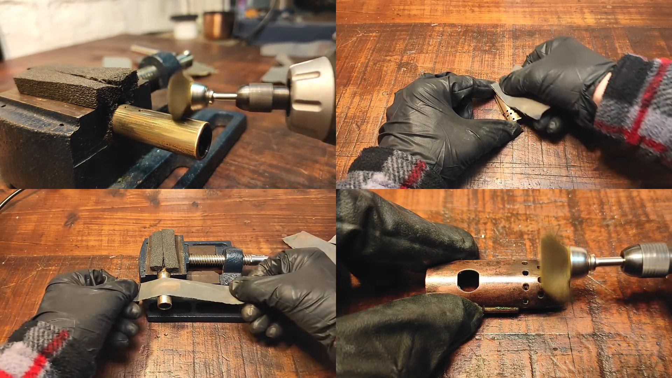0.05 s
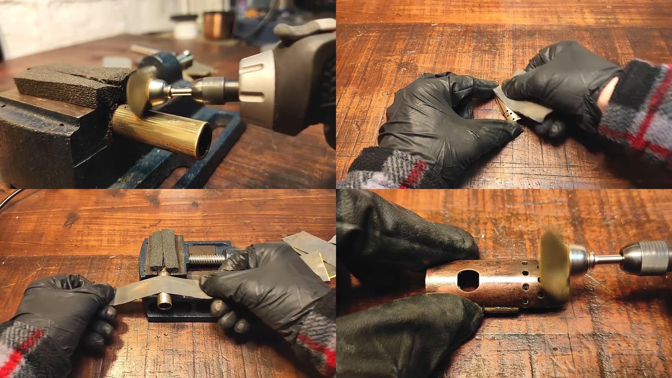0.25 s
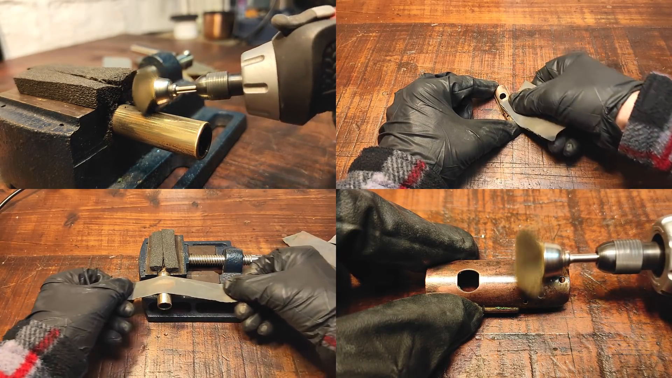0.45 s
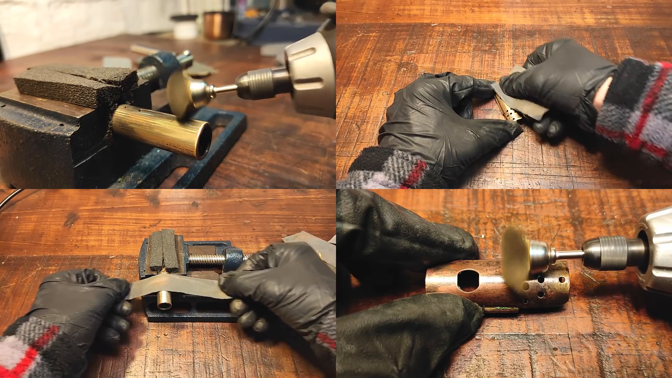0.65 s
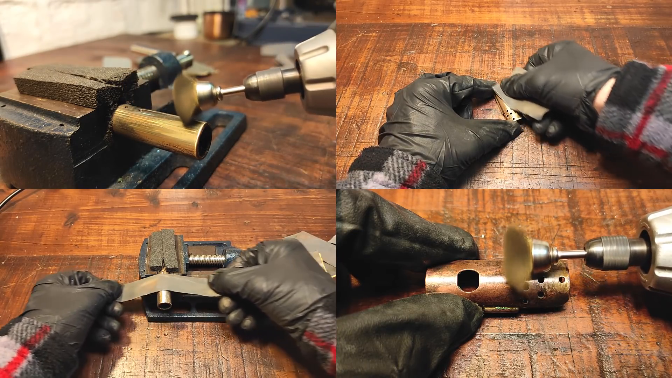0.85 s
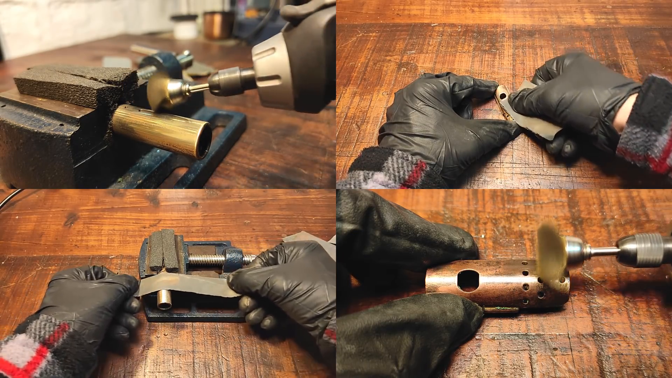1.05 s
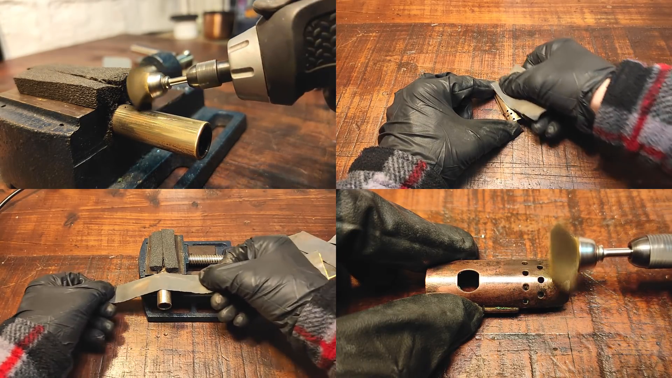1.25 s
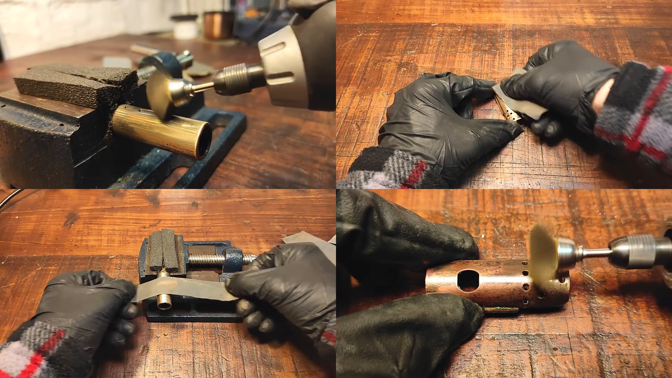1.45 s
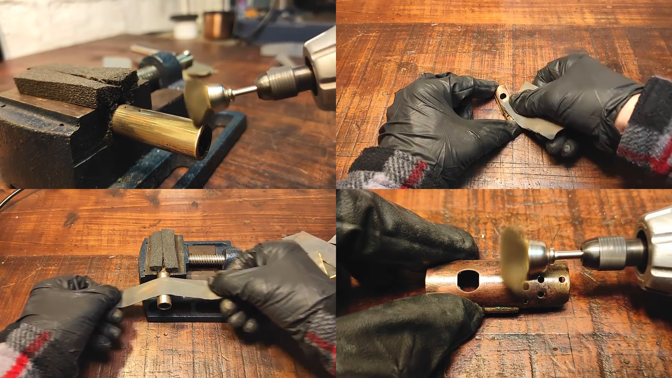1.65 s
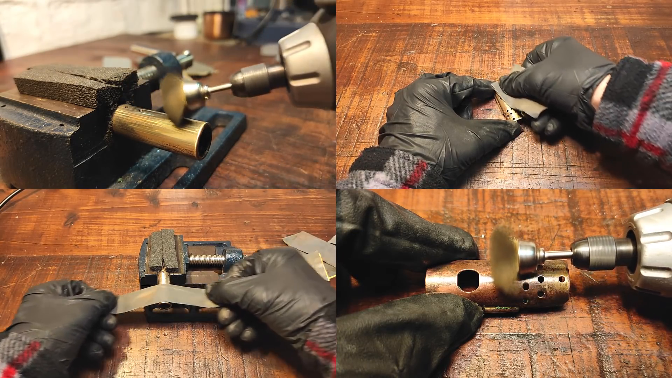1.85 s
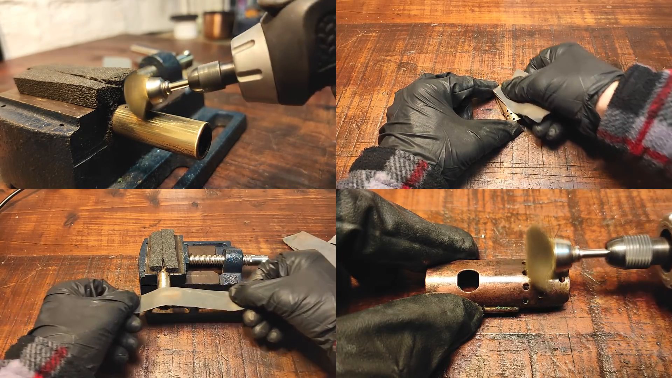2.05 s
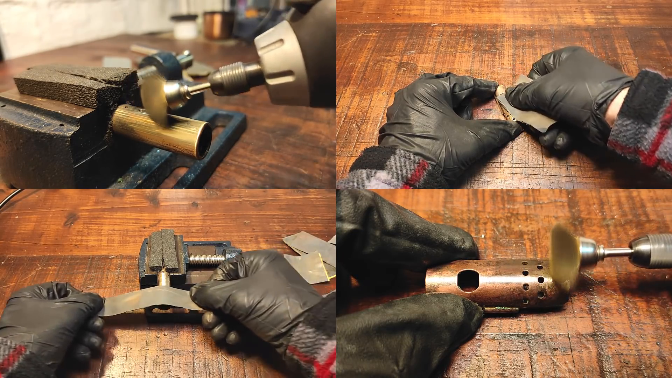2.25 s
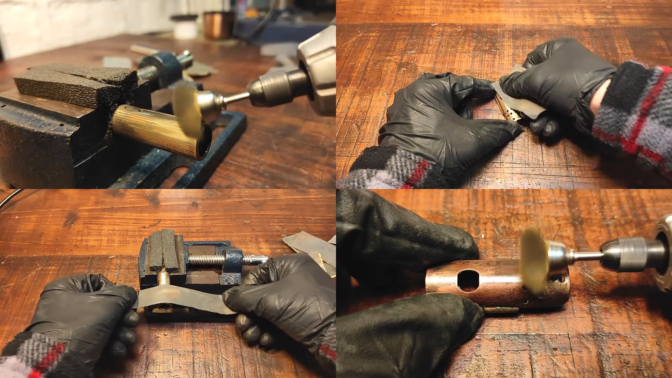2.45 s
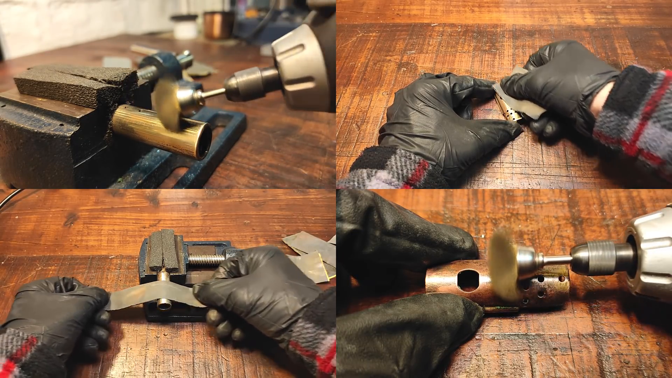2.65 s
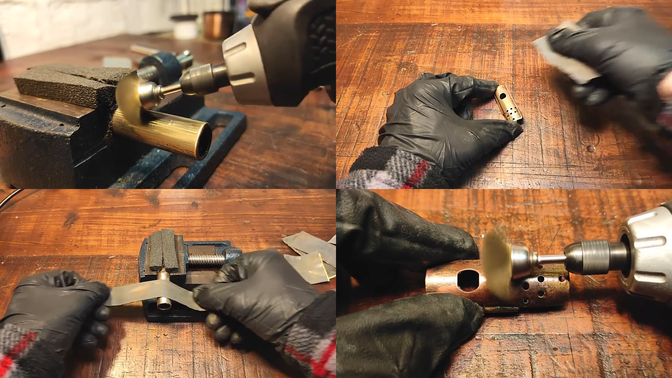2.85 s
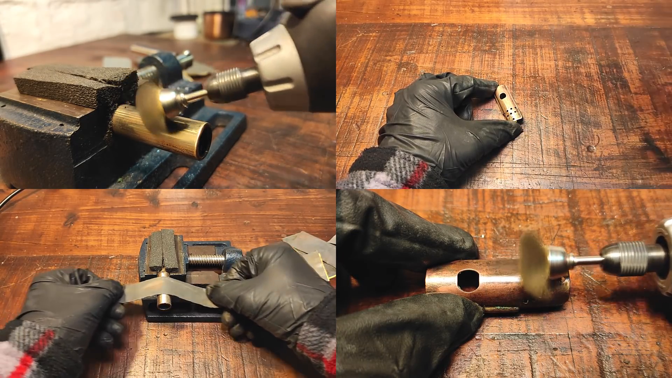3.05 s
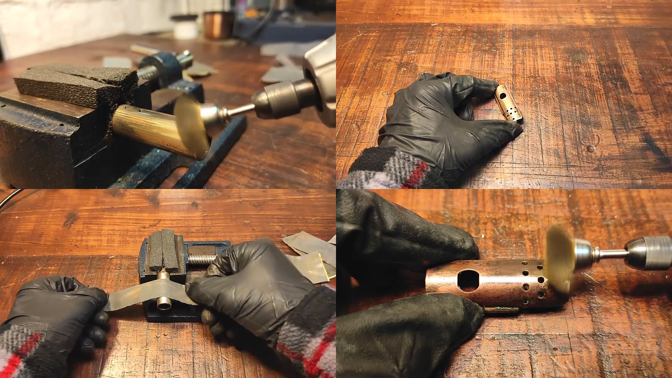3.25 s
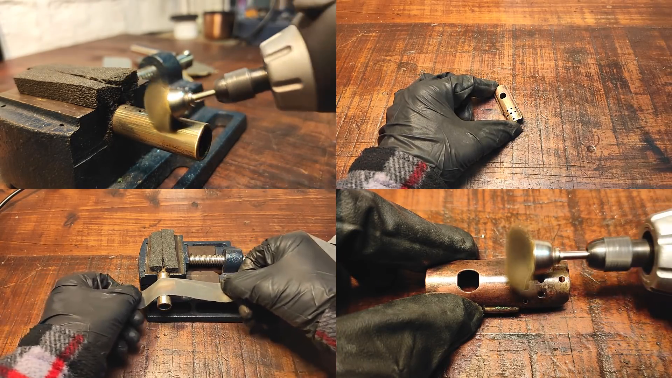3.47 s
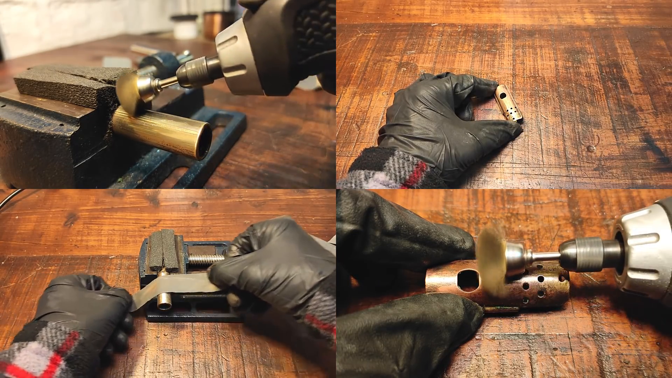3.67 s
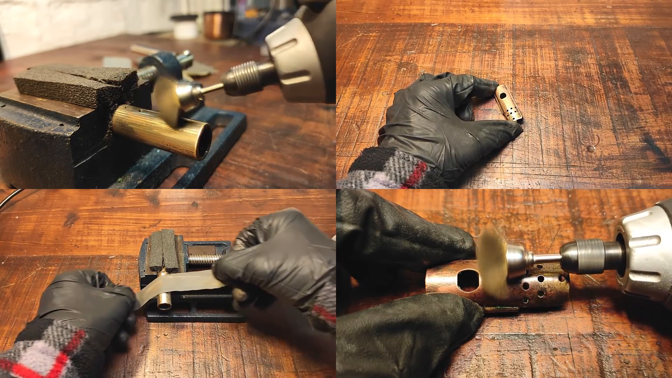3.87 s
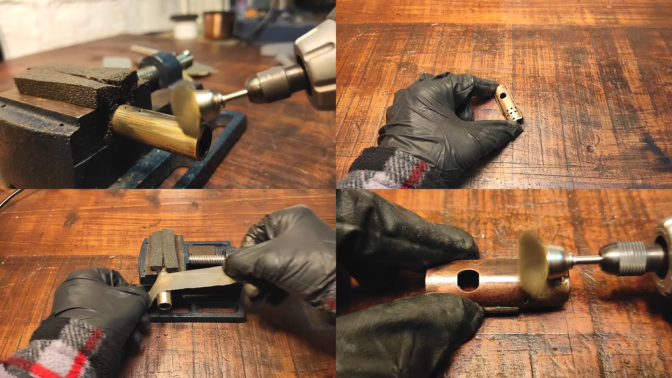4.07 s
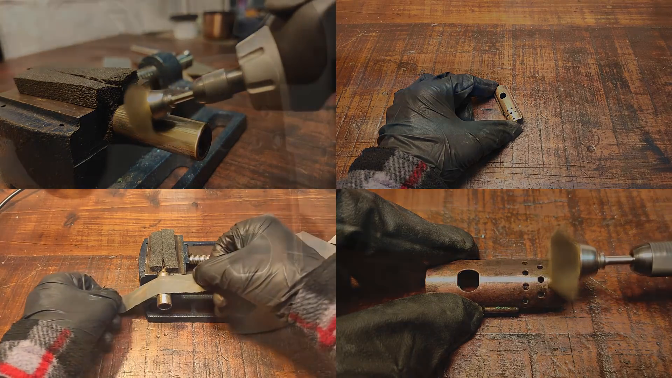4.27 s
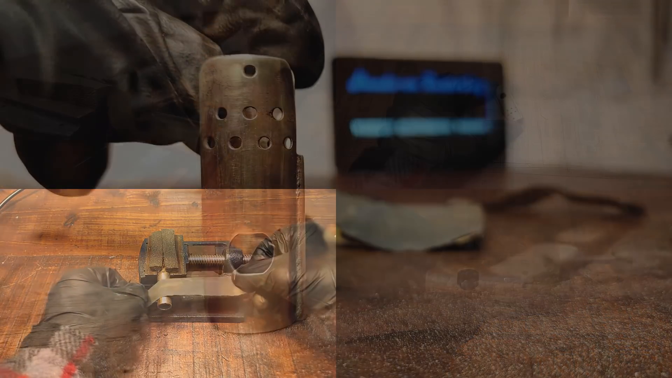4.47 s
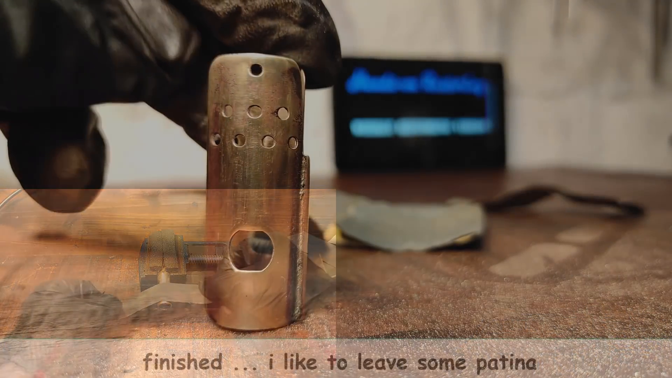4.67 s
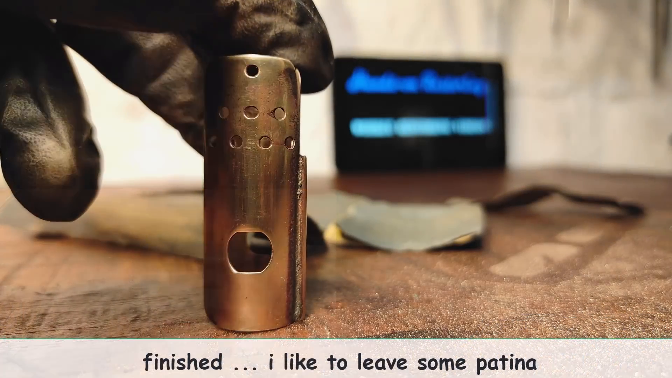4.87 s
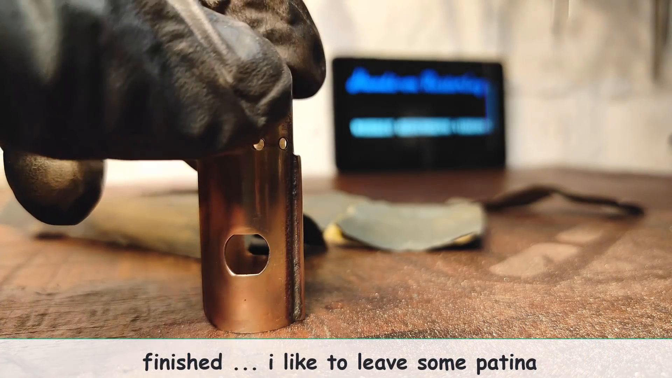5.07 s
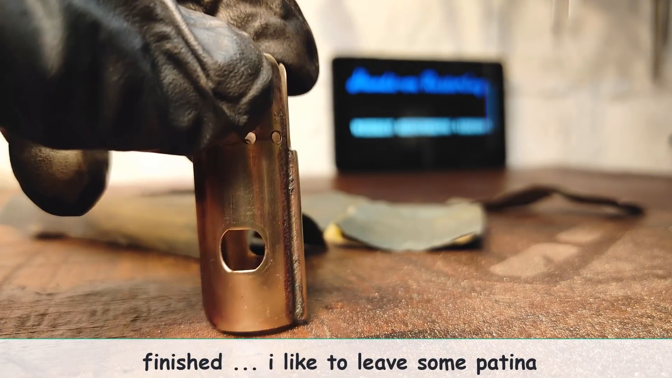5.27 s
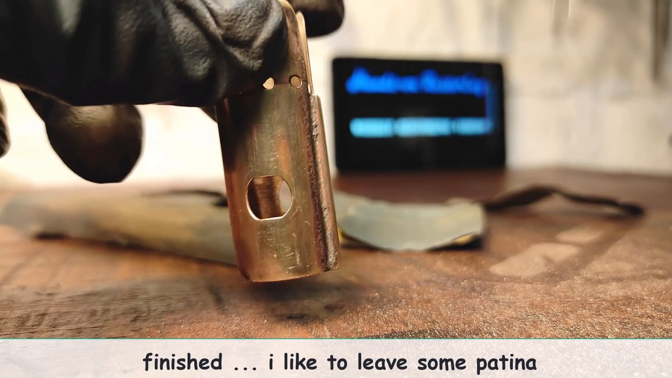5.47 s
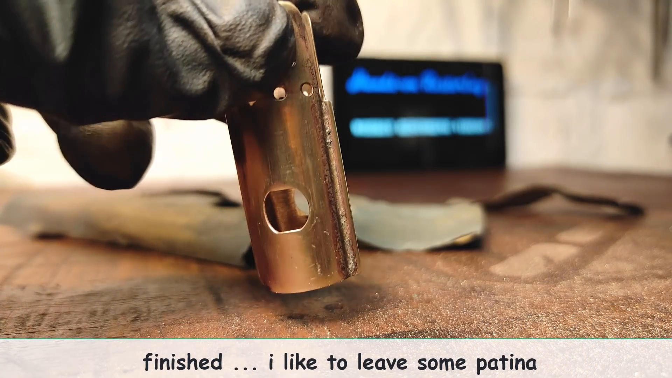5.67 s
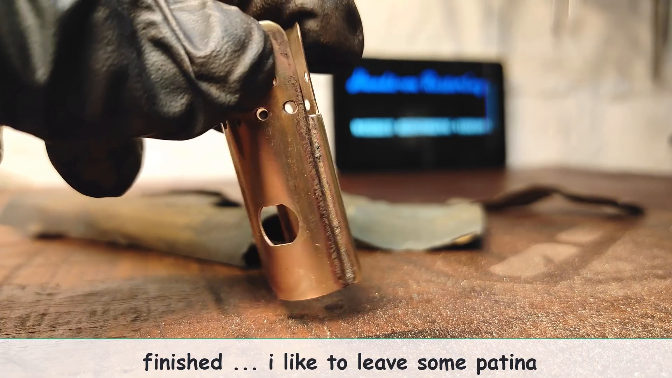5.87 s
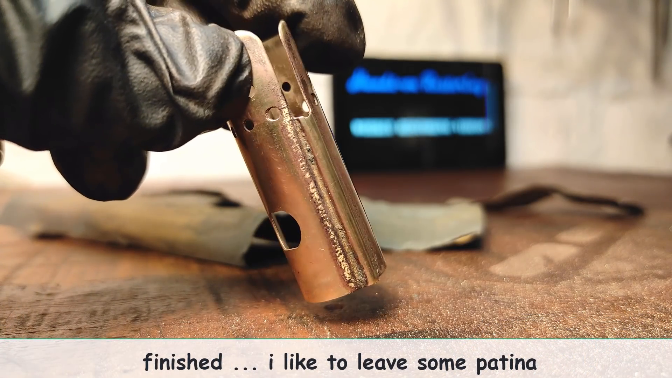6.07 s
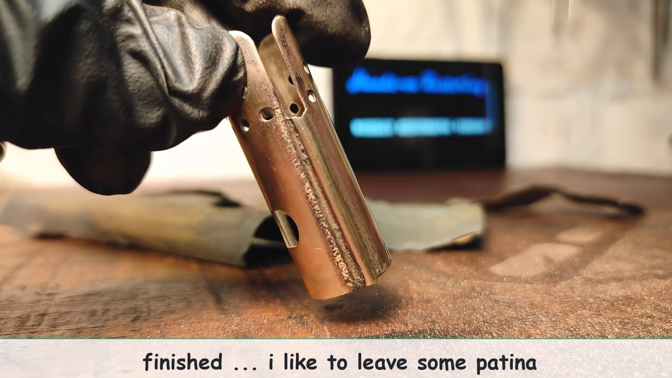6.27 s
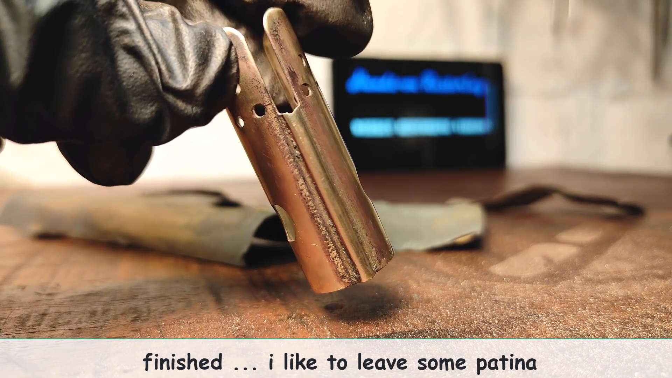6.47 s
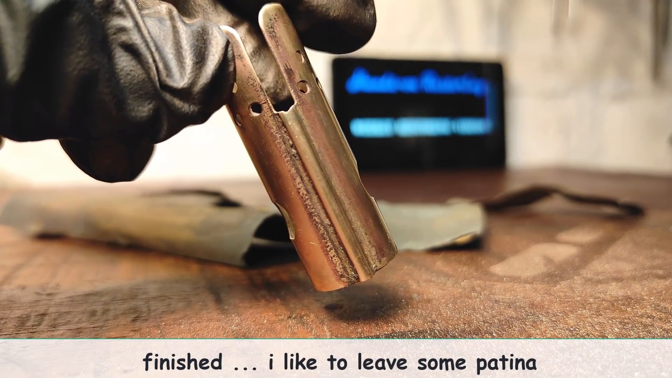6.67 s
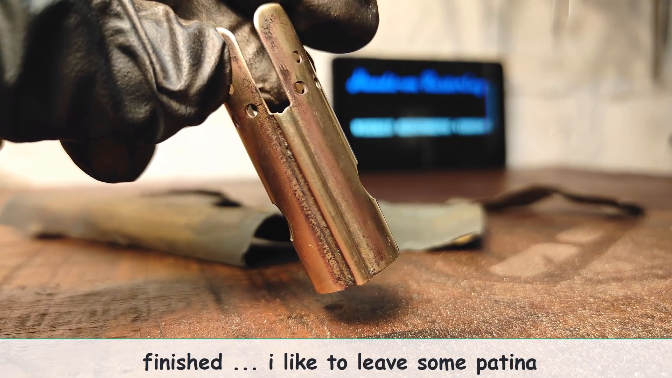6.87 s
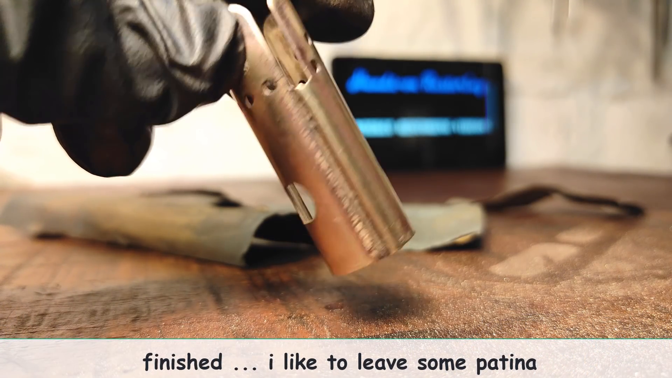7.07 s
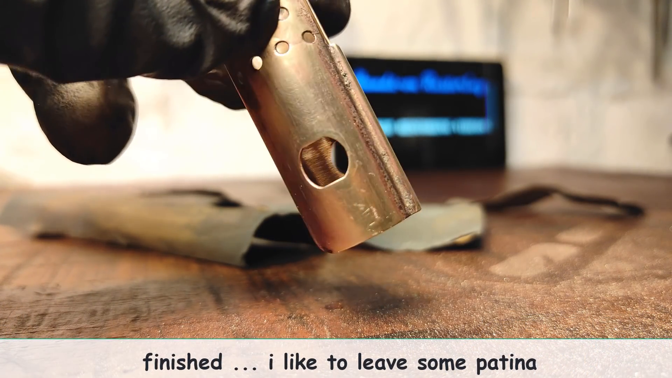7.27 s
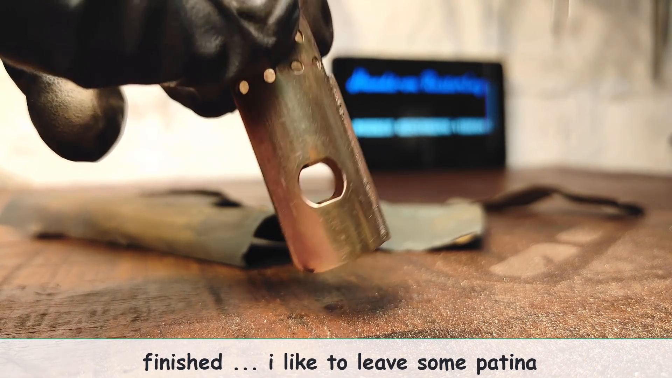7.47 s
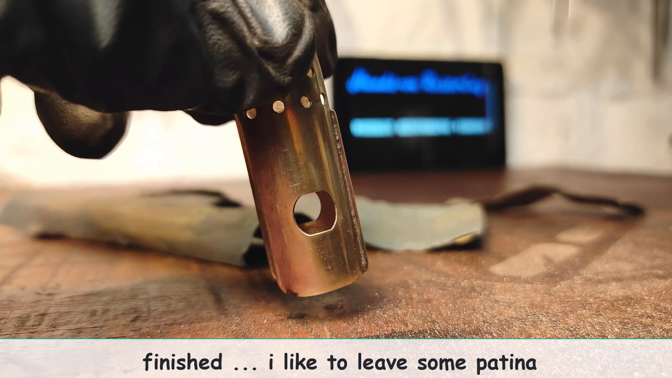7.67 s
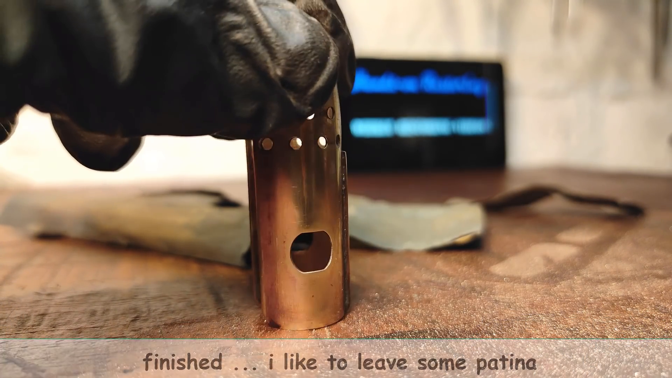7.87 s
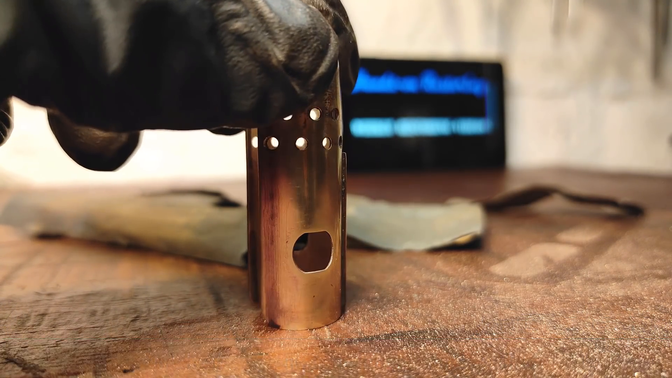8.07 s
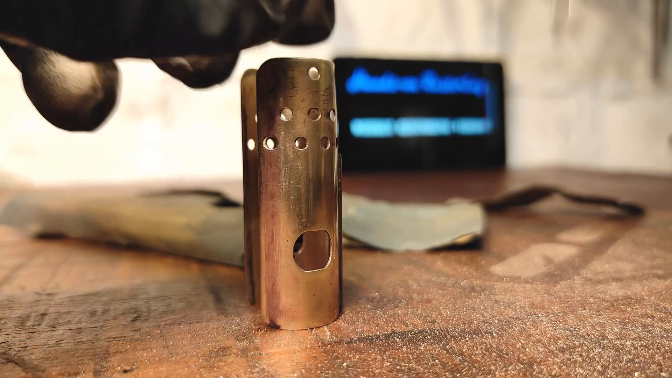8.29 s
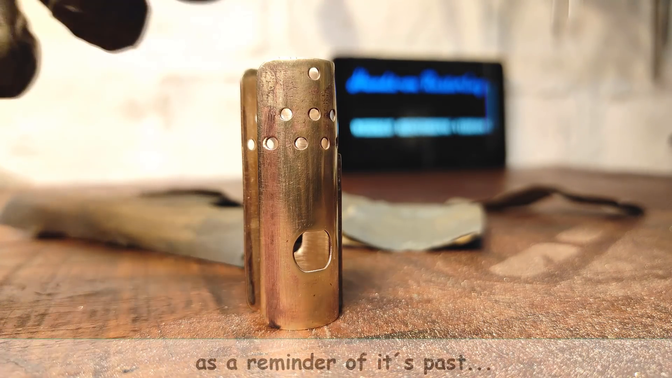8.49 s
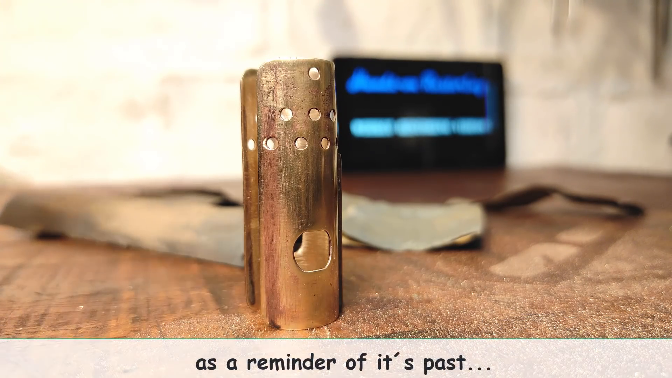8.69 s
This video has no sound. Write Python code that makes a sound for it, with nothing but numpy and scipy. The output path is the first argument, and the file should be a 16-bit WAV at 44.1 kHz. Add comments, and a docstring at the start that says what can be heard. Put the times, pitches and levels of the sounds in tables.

```python
"""A drill at the bench, on the left, spins a wire wheel against a brass tube: rotor orders, gear tones,
fan noise and flicked bristles. On the right sandpaper goes to and fro, about six strokes a second, as gritty
noise; soft bumps are struck frame modes. The work cuts off: gloved handling is slipping noise, the brass
piece knocks, rings and scuffs on the wood, and a distant engine speeds up through the room's resonances."""
import sys
import numpy as np
from scipy import signal
from scipy.fft import rfft, irfft, next_fast_len
from scipy.io import wavfile
from scipy.ndimage import map_coordinates

SR = 44100
rng = np.random.default_rng(int(sys.argv[2]) if len(sys.argv) > 2 else 0)


def wrap_up_sound(samples):
    """Save the sound to the file named by the first command line argument, as 16-bit audio."""
    columns = np.atleast_2d(samples).T
    # keep every value between -1 and 1, then stretch to whole-number steps
    tamed = np.clip(columns, -1, 1)
    steps = np.round(tamed * 32767).astype(np.int16)
    wavfile.write(sys.argv[1], SR, steps)


N = 384993
TIME = np.arange(N) / SR
CUT_S = 4.565  # work stops


def amp(db):
    """Decibels to gain."""
    return 10 ** (np.asarray(db) / 20)


def unit(x):
    """Scale to rms 1."""
    return x / np.sqrt(np.mean(x ** 2) + 1e-20)


def curve(rows):
    """(t/s, value) rows to one value per sample, linear between rows."""
    return np.interp(TIME, *np.transpose(rows))


def along(points, hz):
    """Interpolate each column of (f/Hz, ..) points on a log frequency axis."""
    f, *columns = np.transpose(points)
    return np.array([np.interp(np.log(hz + 1), np.log(f), column) for column in columns])


def wobble(rate_hz):
    """Smooth random curve through rate_hz normal knots a second."""
    knots = rng.standard_normal(int(N * rate_hz / SR) + 4)
    return map_coordinates(knots, [TIME * rate_hz], mode="nearest")


def swell(middle_s, length_s):
    """Gaussian rise and fall of height 1, 1/e at half a length from the middle."""
    return np.exp(-(2 * (TIME - middle_s) / length_s) ** 2)


def pan(side_db):
    """Left and right gains for a left-minus-right level."""
    return amp([[side_db / 2], [-side_db / 2]])


def filtered(x, response):
    """Multiply the spectrum of x by response(hz)."""
    m = next_fast_len(N + 8192)
    return irfft(rfft(x, m) * response(np.fft.rfftfreq(m, 1 / SR)), m)[..., :N]


def coloured(x, spectrum):
    """Shape white stereo excitation of rms 1 to a left and a right spectrum."""
    return filtered(x, lambda hz: amp(along(spectrum, hz)) * np.sqrt(SR / 2))


def resonances(modes, f):
    """Complex response of (f/Hz, width/Hz, level/dB) resonances, signs alternating."""
    total = 0
    for k, (centre, width, db) in enumerate(modes):
        bandpass = 1j * f * width / (centre * centre - f * f + 1j * f * width)
        total = total + (-1) ** k * amp(db) * bandpass
    return total


def air(alike_hz):
    """Stereo noise, nearly alike in both ears well below alike_hz and unrelated well above."""
    a, b = rng.standard_normal((2, N))
    side = filtered(b, lambda hz: np.sqrt(.5 - .45 / (1 + hz / alike_hz)))
    mid = filtered(a, lambda hz: np.sqrt(.5 + .45 / (1 + hz / alike_hz)))
    return np.array([mid + side, mid - side])


def grit(per_second, spread_db, hiss):
    """Random snags of uneven size over a bed of noise, stereo, rms 1."""
    sizes = amp(spread_db * np.minimum(rng.exponential(size=N), 4))
    snags = (rng.random(N) < per_second / SR) * sizes
    signed = unit(snags * rng.choice([-1, 1], (2, N)))
    return unit(signed + hiss * rng.standard_normal((2, N)))


def ring(modes, t, scatter_db):
    """Decaying sines of struck (f/Hz, level/dB, t60/s) modes, strengths redrawn each blow."""
    total = 0
    for k, (hz, db, t60) in enumerate(modes):
        decay = amp(db + rng.normal(0, scatter_db) - 60 * t / t60)
        total = total + (-1) ** k * decay * np.sin(2 * np.pi * hz * t)
    return total


def add(track, s, sound):
    """Mix a sound into a track at s seconds."""
    part = track[:, round(s * SR):][:, :sound.shape[-1]]
    part += sound[..., :part.shape[-1]]


# Workshop reverberation: f/Hz, t60/s
ROOM_DECAY = [(200, .38), (900, .29), (1800, .21), (3000, .27), (12000, .09)]


def echo(x):
    """Room tail: noise whose bands each decay at their own t60, convolved with x."""
    hz, t, z = signal.stft(rng.standard_normal((2, SR // 2)), SR, nperseg=256)
    decay = amp(-60 * t / along(ROOM_DECAY, hz).T)
    tail = signal.istft(z * decay, SR, nperseg=256)[1]
    delayed = np.pad(tail / np.linalg.norm(tail[0]), ((0, 0), (256, 0)))
    return signal.fftconvolve(x, delayed, axes=1)[:, :N]


# Wheel pressure, also drives the motor whine: t/s, relative level/dB
PRESSURE = [(0.0, 2), (0.15, -3), (0.45, 7), (0.95, 16), (1.22, 3), (1.44, -2), (1.6, 11.5), (1.97, 12),
            (2.2, 4), (2.42, 10.5), (2.7, 11), (2.9, 6), (3.2, 9.5), (3.55, 12.5), (3.72, -3), (3.95, 7),
            (4.25, 9.5), (4.55, 4)]
# Sharp wheel resonances: f/Hz, width/Hz, relative level/dB
WHEEL_MODES = [(4490, 450, -14), (8370, 230, 7.5), (9140, 370, -4.5)]


def wire_wheel(turn):
    """Bristles flick the brass, thickest once a rotor turn, and ring in narrow bands."""
    bunch = (.5 + .5 * np.cos(turn)) ** 6
    flicks = grit(800 + 2200 * bunch, spread_db=2, hiss=.3) * (1 + .5 * bunch)
    zing = unit(filtered(flicks, lambda hz: resonances(WHEEL_MODES, hz) / (1 + (hz / 10500) ** 12)))
    # broader rasp as the wheel rides over the tube's end
    scraping = grit(2400, spread_db=-0.5, hiss=0.39)
    scrape = unit(filtered(scraping, lambda hz: resonances([(6730, 1400, 0)], hz) ** 2))
    rasp = swell(3.56, 0.098) * scrape
    return pan(side_db=18.5) * (amp(curve(PRESSURE) - 63) * zing + amp(-46.5) * rasp)


# Rotor turning rate: t/s, f/Hz
ROTOR_RATE = [(0.0, 123.6), (0.22, 126.1), (0.45, 125.1), (0.58, 123.8), (0.72, 125.6), (0.92, 126.1),
              (1.14, 123), (1.39, 126.6), (1.76, 123.4), (1.95, 125.8), (2.13, 123.1), (2.36, 125.2),
              (2.52, 123.4), (2.85, 122.5), (3.13, 124.7), (3.25, 123), (3.44, 122.8), (3.6, 120.6),
              (3.76, 123.2), (3.95, 122.3), (4.13, 123.7), (4.32, 122.2), (4.55, 123.6)]
# Rotor hum: multiple of turning rate, relative level/dB at start, relative level/dB at cut
HUM_ORDERS = [(1, -68.5, -73), (3, -77, -66.5), (4, -68.5, -69), (5, -71, -81), (7, -72, -72),
              (8, -66.5, -69), (9, -68.5, -68.5), (10, -71, -72), (11, -73, -70.5), (14, -72.5, -77),
              (18, -73, -71)]
# Drone at twice the turning rate: t/s, relative level/dB
DRONE_LEVEL = [(0, -63), (.13, -61), (.97, -58.5), (1.13, -68), (1.33, -58.5), (1.65, -59.5), (1.76, -65),
               (1.96, -59.5), (3.57, -59.5), (3.66, -65.5), (3.85, -61), (4.43, -60), (4.55, -60.5)]
# Motor whine: multiple of turning rate, relative level/dB
WHINE_ORDERS = [(35, -74.5), (38, -69.5), (66, -55.5), (68, -57.5), (69, -56), (73, -61.5), (74, -58.5)]
# Steady gear and housing tones: f/Hz, relative level/dB
GEAR_TONES = [(224, -81), (300, -75.5), (401, -79), (431, -81.5)]
# Fan rush spectrum: f/Hz, left level/dB per Hz, right level/dB per Hz
RUSH_SPECTRUM = [(20, -74.5, -95), (61.6, -99, -83), (210, -86, -94.5), (790, -87.5, -95),
                 (1060, -82, -87.5), (1660, -86, -95), (2590, -90.5, -90.5), (3600, -93, -96),
                 (6850, -84, -84.5), (8530, -70, -87.5), (10560, -92, -101), (11160, -88, -100),
                 (12640, -94.5, -100), (14850, -105, -105)]
HUM_FADE_DB, WHINE_FADE_DB = 3.096, 1.68  # slow level wander of each order
WAVER_RAD = .6  # quick phase unsteadiness of each order
RIGHT_LAG_S = 0.00016  # drill reaches the right microphone later


def drill():
    """Rotor orders hum and whine over gear tones and fan rush; the wire wheel rides along."""
    turn = 2 * np.pi * np.cumsum(curve(ROTOR_RATE)) / SR
    # the dragging wheel shakes the rotor, blurring high orders most
    shaken = turn + .07 * wobble(9) + .011 * wobble(45)

    def tone(k, db):
        phase = WAVER_RAD * wobble(26) + rng.uniform(0, 2 * np.pi)
        return amp(db) * np.sin(k * shaken + phase)

    drone = amp(curve(DRONE_LEVEL) + 0.6 * wobble(8.2)) * np.sin(2 * shaken)
    hum = whine = gears = 0
    for k, first_db, last_db in HUM_ORDERS:
        level_db = np.interp(TIME, [0, CUT_S], [first_db, last_db])
        hum = hum + tone(k, level_db + HUM_FADE_DB * wobble(9))
    for k, db in WHINE_ORDERS:
        whine = whine + tone(k, db + .5 * curve(PRESSURE) + WHINE_FADE_DB * wobble(9))
    for hz, db in GEAR_TONES:
        gears = gears + amp(db + 1.53 * wobble(5.9)) * np.sin(2 * np.pi * hz * TIME + .5 * wobble(15))
    tones = amp(-1.5) * pan(side_db=21.5) * (drone + hum + whine + gears)
    rush = unit(air(alike_hz=910) + 0.5 * grit(900, spread_db=-2.0, hiss=0.41))
    sound = tones + coloured(rush, RUSH_SPECTRUM) + wire_wheel(turn)
    return filtered(sound, lambda hz: np.exp(-2j * np.pi * hz * [[0], [RIGHT_LAG_S]]))


# Sanding strokes: turn t/s, force level/dB, lean to stroke end/dB, drag kept through the turn/0-1
STROKES = [(-.04, -0.5, 0, 0.2), (.115, -3.5, 0.5, 0.47), (.255, -1, 0, 0.73), (.41, -3.5, -2, 0.66),
           (.555, 2, -2, 0.5), (.705, 0.5, 0, 0.3), (.855, 3, -2, 0), (1.01, 1.5, 0, 0.1),
           (1.158, 2.5, -2.5, 0.04), (1.32, 0, 1.5, .06), (1.46, 1, -1, 0.5), (1.6, 0, -1, 0.6),
           (1.755, 1, -2, 0.55), (1.91, -1.5, -0.5, 0.64), (2.05, 0.5, -1, 0.5), (2.214, -1, 1.5, 0.4),
           (2.362, 0.5, -1.5, 0.2), (2.53, -1.5, 0, 0.26), (2.685, 4, 0, 0.86), (2.88, -4.5, 5.5, 0),
           (3.045, -2, -2, 0.3), (3.21, -5.5, 0, 0), (3.375, -2, 1, 0.2), (3.545, -6, 3, 0.4),
           (3.715, -5.5, 1, 0), (3.885, -10, 1.5, 0), (4.055, -5.5, 0, 0), (4.225, -7.5, 2, 0),
           (4.4, -8, 1, 0.4), (4.58, 10, 0, 0.2)]
# Sandpaper spectrum: f/Hz, left relative level/dB, right relative level/dB
PAPER_SPECTRUM = [(200, -115, -105), (1000, -111.5, -101), (2860, -88.5, -88.5), (3550, -93.5, -88),
                  (5350, -87, -83), (6280, -77, -76.5), (6910, -95, -69.5), (7530, -85, -69),
                  (7700, -79, -75.5), (8200, -80, -73.5), (9520, -79, -87.5), (10750, -99, -91.5),
                  (12600, -92.5, -91.5), (15100, -100, -104)]
SNAG_SPREAD_DB = 3  # uneven catch of the grains


def sandpaper():
    """Paper slows at each turn, bites quickly and catches more grains the faster it moves."""
    turns, force_db, lean_db, drags = np.transpose(STROKES)
    travel = np.interp(TIME, turns, np.arange(len(turns)))
    speed = np.abs(np.sin(np.pi * travel))
    drag = np.interp(TIME, turns, np.clip(drags, 0, 1))
    bite = drag + (1 - drag) * np.tanh(1.7 * speed ** 1.6)
    stroke_db = np.interp(travel - .5, np.arange(len(turns)), force_db)
    push_db = stroke_db - lean_db[travel.astype(int)] * np.sin(2 * np.pi * travel)
    force = amp(push_db + 1.1 * wobble(90))
    grains = grit(1200 + 2500 * speed, spread_db=SNAG_SPREAD_DB, hiss=1.0)
    return force * bite * coloured(grains, PAPER_SPECTRUM)


# Dull bumps on the bench: t/s, level/dB
THUMPS = [(1.049, -47), (1.752, -48), (3.925, -37.5), (4.256, -32.5), (5.136, -61), (5.368, -59),
          (6.469, -63), (7.956, -48), (8.304, -58), (8.367, -58)]
# Bench frame modes: f/Hz, relative level/dB, t60/s
FRAME_MODES = [(75, -14, .2), (125, -11, .09), (196, -5, .035), (335, -4, .06), (472, 0, .08)]


def bumps():
    """Soft blows of hand and tools set the bench frame ringing, with a rounded onset."""
    out, t = np.zeros((2, N)), np.arange(SR // 4) / SR
    onset = 1 - np.exp(-t / 0.0048)
    for s, db in THUMPS:
        add(out, s, amp(db) * pan(side_db=2.5) * ring(FRAME_MODES, t, scatter_db=4.5) * onset)
    return out + amp(-13) * echo(out)


# Glove slides on brass: middle t/s, length/s, hiss relative level/dB, dull rub relative level/dB
SLIDES = [(4.56, 0.08, -2.5, -18), (4.673, 0.1, -3, -33), (4.773, 0.17, -3.5, -28), (4.9, 0.18, -2.5, 1.5),
          (5.04, 0.21, -17, -7), (5.221, 0.049, -8, -2), (5.462, 0.13, -15.5, -12),
          (5.601, 0.063, -5.5, -7), (5.773, 0.11, -9, -6.5), (6.015, 0.09, -26, -37),
          (7.24, 0.18, -28.5, -35), (7.47, 0.43, -34, -36), (8.296, 0.096, -22.5, -33),
          (8.73, 0.24, -16.5, -18)]
# Leather hiss spectrum: f/Hz, left relative level/dB, right relative level/dB
GLOVE_SPECTRUM = [(200, -108, -108), (800, -109, -108), (1500, -111, -108), (2900, -110, -106),
                  (4930, -108, -91), (6330, -108, -87.5), (7100, -104, -78), (8740, -89.5, -92),
                  (9600, -104, -101), (10900, -113, -109), (14600, -115, -115)]
HOLD_DB = -38.5  # rustle while only holding, relative to the slides
FLUTTER_DB = 1.3  # unevenness of the sliding


def glove():
    """Leather slides on brass in small slips with sharper creaks; a firm slide adds a duller rub."""
    creaks = grit(130, spread_db=15.0, hiss=0)
    slips = unit(grit(1500, spread_db=-5, hiss=1.0) + 0.16 * creaks)
    hissing, rubbing = amp(HOLD_DB), 0
    for s, length, hiss_db, rub_db in SLIDES:
        hissing = hissing + amp(hiss_db) * swell(s, length)
        rubbing = rubbing + amp(rub_db) * swell(s, length)
    dull = grit(830, spread_db=2.5, hiss=0.96)
    rub = unit(filtered(dull, lambda hz: resonances([(2460, 6100, 0)], hz) ** 2))
    flutter = amp(FLUTTER_DB * wobble(45))
    return flutter * (hissing * coloured(slips, GLOVE_SPECTRUM) + amp(-66.5) * rubbing * rub)


# Distant engine firing rate: t/s, f/Hz
FIRING_RATE = [(4.6, 45.6), (5.6, 52.8), (7.1, 68.1), (8.73, 81.3)]
# Bass room resonances: f/Hz, width/Hz, relative level/dB
BOOMS = [(54.3, 1.8, -56), (64.5, 6.1, -50), (80.2, 2, -59.5), (91.4, 4.1, -56.5), (101, 3.8, -61),
         (151.5, 5.8, -53), (246.6, 14.6, -67.5)]


def engine():
    """Engine orders climb through the room's resonances and swell in each."""
    firing = curve(FIRING_RATE)
    turn = 2 * np.pi * np.cumsum(firing) / SR

    def boom(hz):
        peaks = sum(amp(db) / (1 + ((hz - centre) / width) ** 2) ** 2 for centre, width, db in BOOMS)
        return amp(-80) + peaks

    orders = 0
    for k, db in enumerate([-4.5, -7.5, -6.5, -10.0, -9.0], 1):
        orders = orders + amp(db + 1.26 * wobble(3.6)) * boom(k * firing) * np.sin(k * turn)
    return pan(side_db=5.5) * orders


# Background spectrum: f/Hz, left level/dB per Hz, right level/dB per Hz
QUIET_SPECTRUM = [(20, -88.5, -85), (59.4, -84.5, -88), (103, -95.5, -100), (210, -95.5, -101.5),
                  (420, -104, -106), (805, -111, -113), (1490, -118, -117), (5540, -125, -123),
                  (6900, -122, -115), (8720, -112, -115), (9000, -128, -128), (13200, -140, -140)]


def quiet_room():
    """Steady background noise, nearly alike in both ears in the bass."""
    return coloured(air(alike_hz=450), QUIET_SPECTRUM)


# Brass piece contacts: t/s, wood knock relative level/dB, metal click relative level/dB,
# left-minus-right level/dB, freedom to move and ring/0-1, knock brightness f/Hz
CONTACTS = [(4.9565, -78, -38.5, -8, .1, 890), (4.9598, -78, -39.5, -8, .1, 890),
            (5.136, -68, -44, -10, .1, 700), (5.1585, -82, -53, -10, .1, 900),
            (5.2345, -39, -42, -1, .26, 1700), (5.366, -59, -63, -3, 0.4, 1500),
            (6.47, -69, -68, 2, .1, 1100), (7.009, -83, -59, -1, .1, 900),
            (7.9512, -41, -44, 0, 0.93, 3000)]
# rim chatter: first gap of a free piece, each gap over the last, most rebounds, loss per rebound in a tight grip
CHATTER_S, CHATTER_GROWS, REBOUNDS, GRIP_LOSS_DB = 0.0028, 1.15, 4, 15


def touches():
    """Each contact with its rebounds: the freer the piece, the faster and longer it chatters."""
    for s, knock_db, click_db, side_db, free, bright_hz in CONTACTS:
        free = np.clip(free, .05, 1)
        for k in range(1 + round(REBOUNDS * free)):
            loss_db = GRIP_LOSS_DB * (1 - free) * k
            yield s, knock_db - loss_db, click_db - loss_db, side_db, free, bright_hz
            s += CHATTER_S / free * CHATTER_GROWS ** k * rng.uniform(.85, 1.15)


# Wooden bench top modes: f/Hz, relative level/dB, t60/s
BENCH_MODES = [(267, -15, .08), (352, -8, .08), (440, -10, .07), (556, 0, .06), (603, -3, .06),
               (654, 1.5, .065), (752, 1.5, .06), (800, -2, .055), (915, -4, .055), (1010, -3, .06),
               (1120, 0, .04), (1260, -2, .035), (1580, -3, .024), (1850, -4, .02), (3050, -17, .06)]
# Brass tube modes, split into close pairs by the seam: f/Hz, relative level/dB, t60/s
BRASS_MODES = [(5230, -22.5, .09), (6217, -16, .13), (6262, -24, .1), (7318, -18, .17), (7385, -24, .11),
               (7760, -21, .16), (8480, -19, .06)]
SCATTER_DB = 1.5  # spread of bench mode strengths from blow to blow


def brass_piece():
    """Contacts knock the wood, click and ring the tube; soft ones are dull, the glove chokes the ring."""
    out, t = np.zeros((2, N)), np.arange(SR // 3) / SR
    edge = signal.butter(2, [6000, 11000], "bandpass", fs=SR, output="sos")
    crowd = signal.butter(2, [520, 2100], "bandpass", fs=SR, output="sos")
    for s, knock_db, click_db, side_db, free, bright_hz in touches():
        # the board's crowded modes merge into a short clack
        clack = 4.44 * amp(-60 * t / 0.031) * signal.sosfilt(crowd, rng.standard_normal((2, len(t))))
        dulling = signal.butter(5, bright_hz, fs=SR, output="sos")
        wood = signal.sosfilt(dulling, clack + 0.41 * ring(BENCH_MODES, t, SCATTER_DB))
        crack_decay = amp(-60 * t / (0.0021 + 0.045 * free))
        crack = 1.25 * crack_decay * signal.sosfilt(edge, rng.standard_normal((2, len(t))))
        tube = np.array([ring(BRASS_MODES, t, scatter_db=2) for _ in range(2)])
        grip = free * amp(-60 * t / .1 * (1 / free - 1))
        add(out, s, pan(side_db) * (amp(knock_db) * wood + amp(click_db) * (crack + grip * tube)))
    out = filtered(out, lambda hz: 1 / (1 + (hz / 12500) ** 6))
    return out + amp(-9.5) * echo(out)


# Rim scuffs as the hand lets go: middle t/s, length/s, level/dB, rub centre f/Hz
SCUFFS = [(8.311, .022, -62, 500), (8.34, .02, -67, 450), (8.359, .016, -62.5, 780),
          (8.381, .018, -64, 560)]


def scuffs():
    """The tube's rim catches and slips on the wood, and the board answers with a low rub."""
    out = np.zeros((2, N))
    for s, length, db, centre_hz in SCUFFS:
        slips = unit(air(alike_hz=3000) + 1.2 * grit(500, spread_db=11, hiss=0))
        rub = unit(filtered(slips, lambda hz: resonances([(centre_hz, 300, 0)], hz) / (1 + (hz / 950) ** 6)))
        out += amp(db) * swell(s, length) * rub
    return out + amp(-20) * echo(out)


def scene():
    """Loud work, a sudden cut, then quiet handling."""
    working = np.clip((CUT_S - TIME) / 0.0083 + .5, 0, 1)  # 8.3 ms crossfade
    work = drill() + sandpaper()
    handling = glove() + engine() + quiet_room()
    return working * work + bumps() + (1 - working) * handling + brass_piece() + scuffs()


TOP_HZ = 15550


def record(dry):
    """Remove everything from the band limit up."""
    return filtered(dry, lambda hz: hz < TOP_HZ)


dry = scene()
out = record(dry)
wrap_up_sound(out)
```